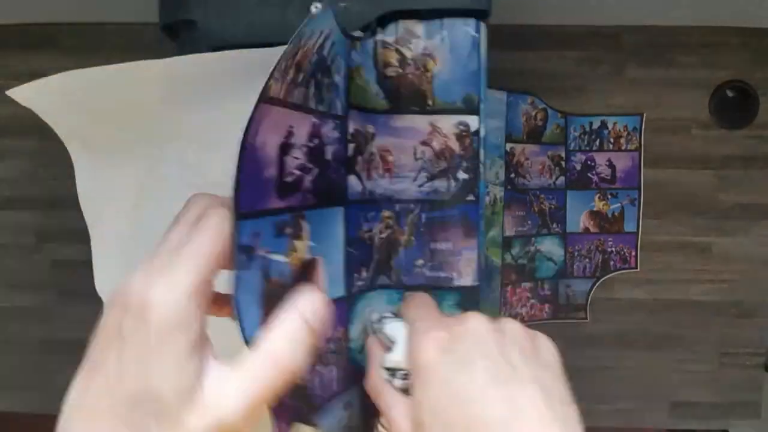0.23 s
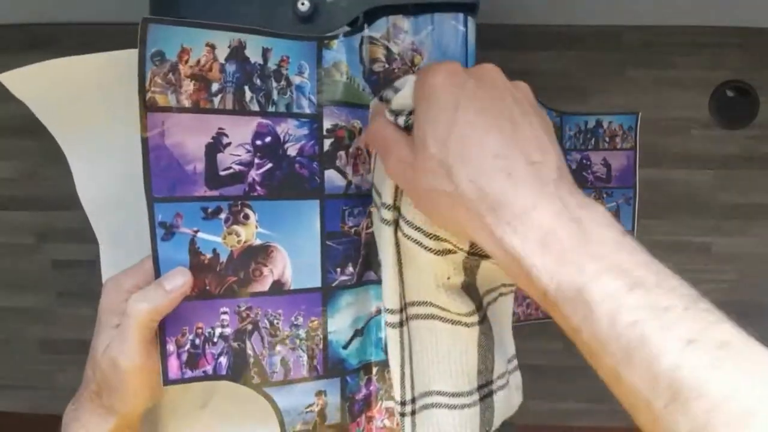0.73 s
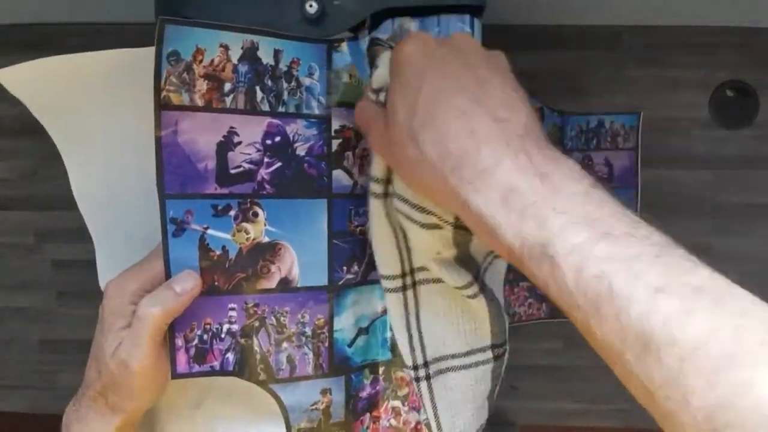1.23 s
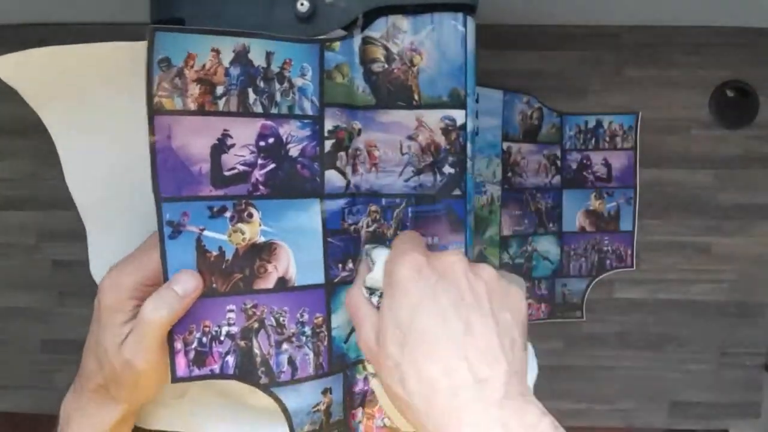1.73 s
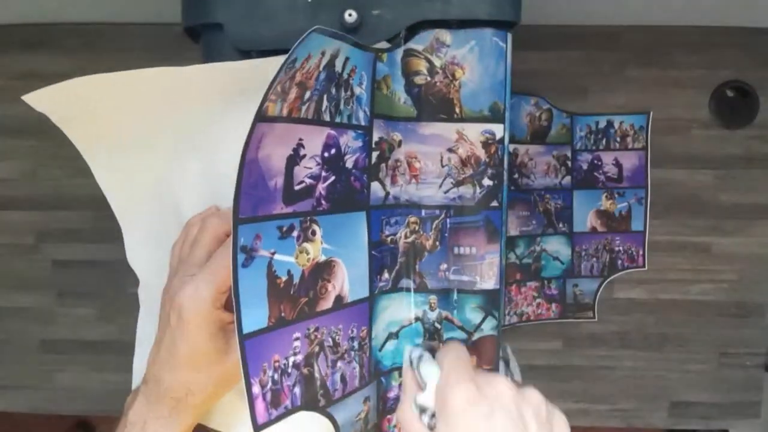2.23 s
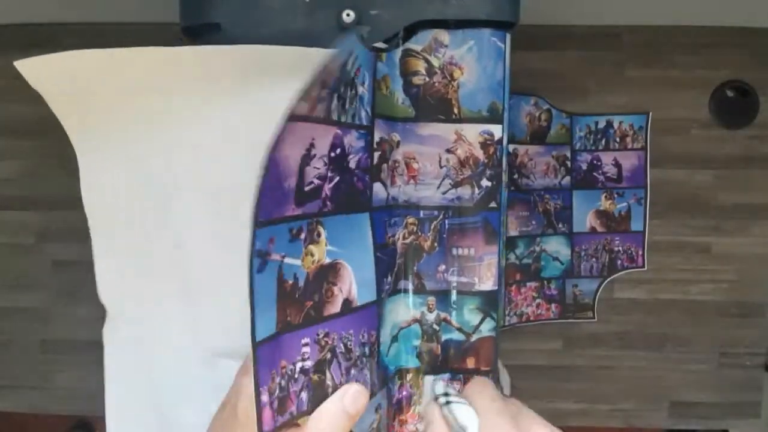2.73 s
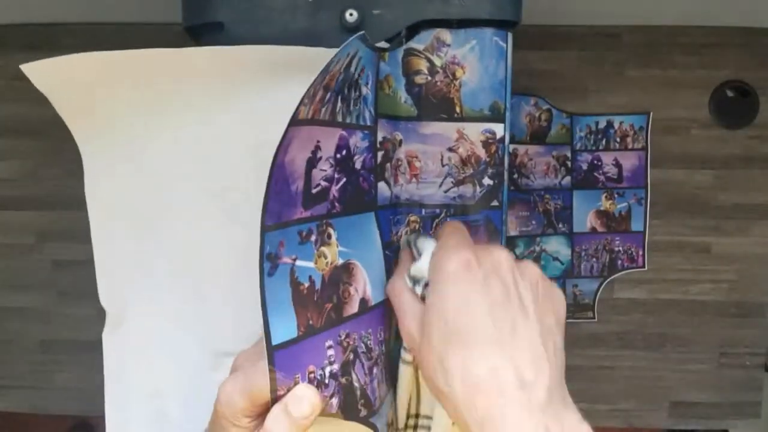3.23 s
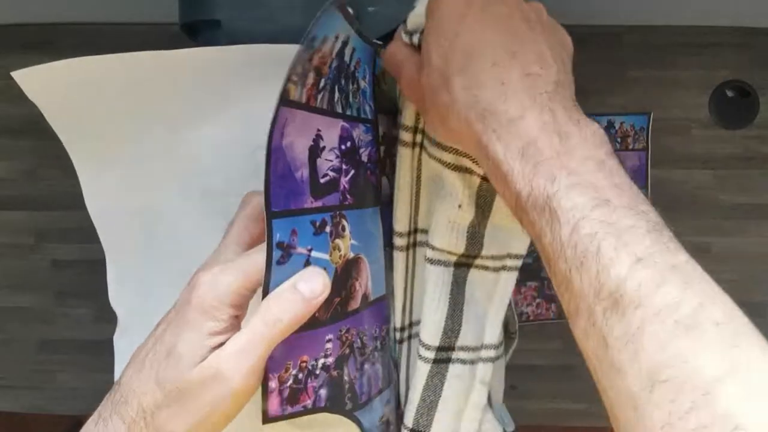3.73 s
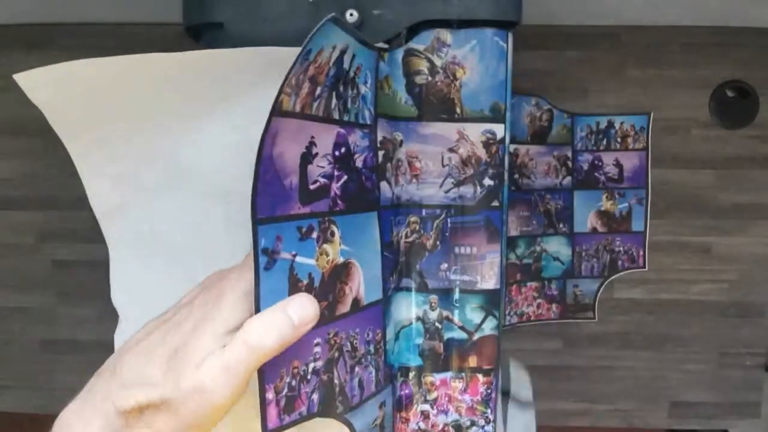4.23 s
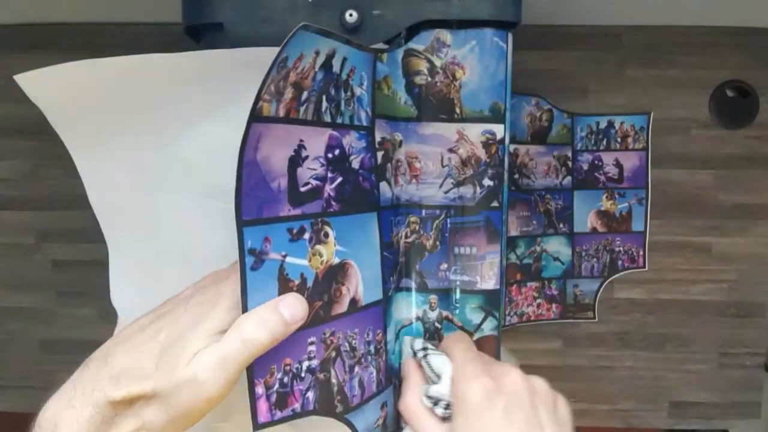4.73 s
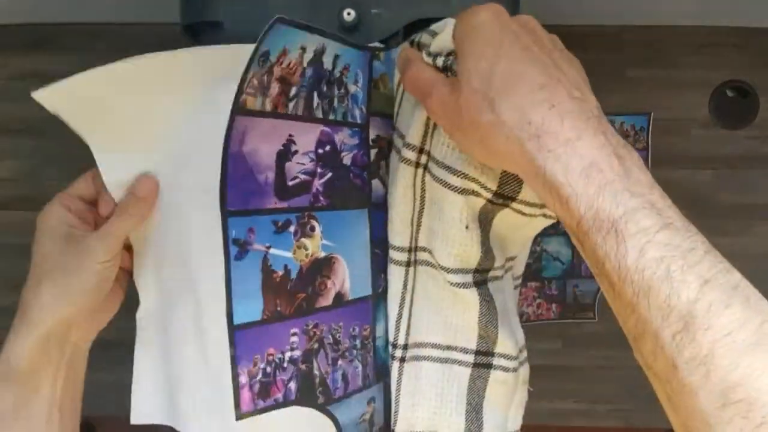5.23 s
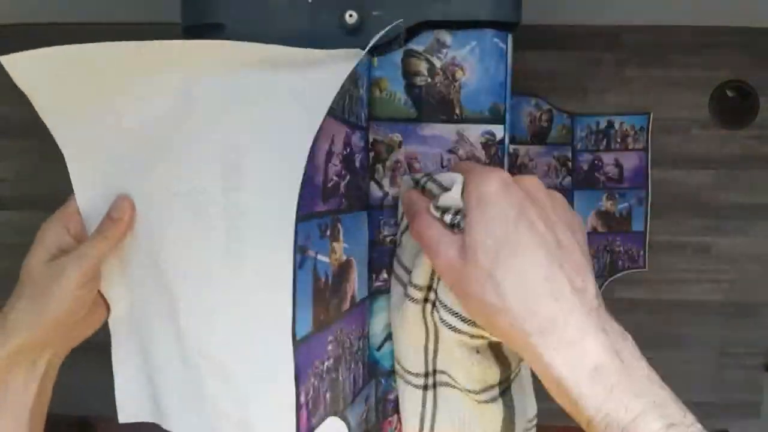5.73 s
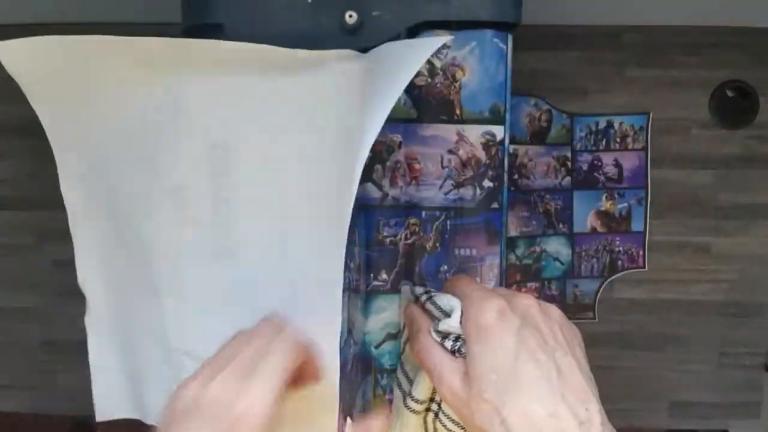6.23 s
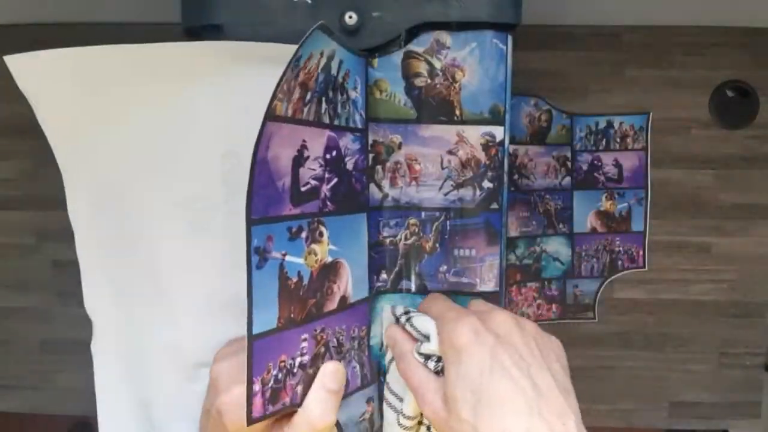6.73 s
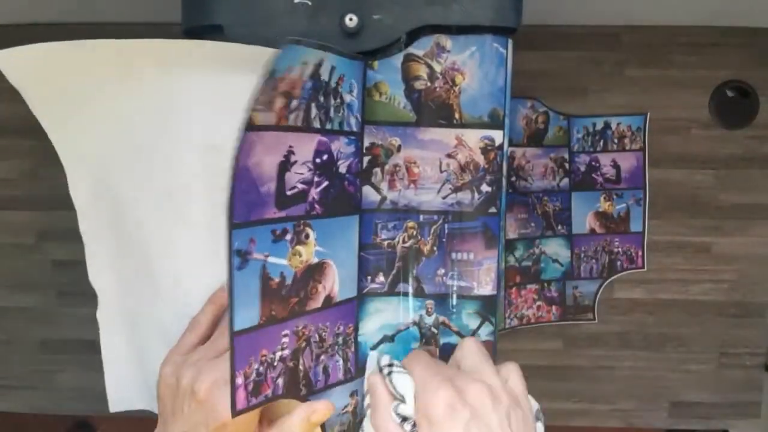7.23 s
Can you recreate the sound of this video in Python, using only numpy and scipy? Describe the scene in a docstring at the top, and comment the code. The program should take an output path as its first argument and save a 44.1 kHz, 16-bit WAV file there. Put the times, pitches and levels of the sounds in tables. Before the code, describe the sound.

A folded cloth rubs sticky film onto a hollow surface: dull irregular knocks, short dry scuffs, crisp crackles and bending paper, heard close indoors.

```python
"""Soft, hollow thumps come first, over a low room tone, then the hiss of cloth and sharp snaps among them.
A hand presses adhesive film onto a ridged hollow panel with a folded cloth, just under a phone, in a small room.
Each press is an impulse that rings the panel's low modes; the sliding cloth hisses by stick-slip friction.
Film and backing paper snap and crackle as filtered noise bursts; a bending sheet rings with rising pitch.
Near walls add a short diffuse tail, and two microphone ports pick up the sum."""
import sys
import numpy as np
from scipy import signal
from scipy.fft import rfft, irfft
from scipy.io import wavfile
from scipy.ndimage import uniform_filter1d

SR = 44100
rng = np.random.default_rng(int(sys.argv[2]) if len(sys.argv) > 2 else 0)


def log_audio(samples):
    """Write samples as a 16-bit WAV file to the path given in sys.argv[1]."""
    # one column per channel
    frames = np.atleast_2d(samples).T
    # limit to full scale, then quantise
    limited = np.clip(frames, -1, 1)
    pcm = np.round(limited * 32767).astype(np.int16)
    wavfile.write(sys.argv[1], SR, pcm)


N = 330750


def undb(db):
    """Logarithmic level: dB to amplitude gain."""
    return 10 ** (np.asarray(db) / 20)


def level(x, db):
    """Effective value: scale a signal to an rms level in dB."""
    return x * undb(db) / np.sqrt(np.mean(x ** 2))


def band(x, hz, width_hz):
    """Simple resonance: a band-pass with gain 1 at its centre."""
    b, a = signal.iirpeak(hz, hz / width_hz, fs=SR)
    return signal.lfilter(b, a, x)


def resonate(x, modes):
    """Modal superposition: a sum of driven resonances, rms 1."""
    return level(sum(undb(db) * band(x, hz, width_hz) for hz, width_hz, db in modes), 0)


def hump(x, hz, octaves):
    """Spectral shaping: a bell-shaped band on a log-frequency axis, rms 1."""
    n = x.shape[-1]
    f = np.maximum(np.arange(n // 2 + 1) * SR / n, 1)
    bell = np.exp(-.5 * (np.log2(f / hz) / octaves) ** 2)
    return level(irfft(rfft(x) * bell, n), 0)


def colour(x, points):
    """Linear filtering: apply a curve of gain/dB against f/Hz, interpolated on log frequency."""
    hz, db = np.transpose(points)
    log_f = np.log(np.maximum(np.arange(N // 2 + 1) * SR / N, 1))
    return irfft(rfft(x) * undb(np.interp(log_f, np.log(hz), db)), N)


def walk(rate_hz):
    """Random modulation: levels held for 1 / rate and slewed twice, spread near 1."""
    k = int(SR / rate_hz)
    steps = np.repeat(rng.standard_normal(N // k + 1), k)
    return 1.44 * uniform_filter1d(uniform_filter1d(steps, k), k)[:N]


def pair(alike, n=N):
    """Interchannel coherence: two noises that share a common part."""
    alike = np.clip(alike, 0, 1)
    mid, side = rng.standard_normal((2, n))
    return np.sqrt((1 + alike) / 2) * mid + np.sqrt((1 - alike) / 2) * side * np.array([[1], [-1]])


def sides(pan_db):
    """Level difference: left and right gains."""
    return undb(np.array([pan_db, -pan_db]) / 2)


def add(out, s, piece, lag_s=0.):
    """Arrival-time difference: mix in a short sound that reaches the right port lag_s later."""
    for side, at in enumerate((s, s + lag_s)):
        i = int(at * SR)
        a, b = max(i, 0), min(i + piece.shape[-1], N)
        out[side, a:b] += piece[side, a - i:b - i]


# spectrum of the room tone: f/Hz, spectral level/dB (per Hz, relative)
ROOM_SPECTRUM = [(12, -64), (20, 13.5), (49, 4.5), (123, 18.5), (227, -6.5), (292, 12), (432, -17),
                 (1500, -40), (4910, -48), (10700, -64), (15900, -115)]
ROOM_DB = -65  # rms before the slow drift


def room_tone():
    """Stationary noise: the same coloured noise at both ports, its level drifting slowly."""
    return level(colour(pair(1.0), ROOM_SPECTRUM), ROOM_DB) * undb(0.25 * walk(6.7))


ECHO_T60_S, ECHO_DB = 0.22, -18


def room(x):
    """Diffuse reverberation: near walls return a short, dull, exponentially decaying tail."""
    t = np.arange(int(.3 * SR)) / SR
    decay = np.exp(-np.log(1000) * t / ECHO_T60_S) * (t > .004)
    tail = band(rng.standard_normal((2, len(t))), 1440, 3700) * decay
    tail = tail / np.sqrt((tail ** 2).sum(1, keepdims=True))  # unit energy per side
    return undb(ECHO_DB) * signal.fftconvolve(x, tail, axes=1)[:, :N]


# sliding of the cloth under the louder strokes: t/s, hiss level/dB, treble level/dB, panel rumble level/dB
SLIDE_LEVELS = [(0.0, -69, -80, -60), (0.5, -77.5, -83, -64), (1.19, -74, -85.5, -61.5),
                (2.15, -74.5, -82, -60), (2.4, -70, -77, -58), (3.34, -65.5, -73, -56),
                (3.72, -65, -79, -66), (4.11, -78, -75, -55), (4.41, -66.5, -67, -63), (4.6, -74, -92, -62),
                (4.84, -65.5, -63.5, -66.5), (4.99, -64, -79, -50.5), (5.22, -62, -73, -45.5),
                (5.41, -67, -78, -54), (5.83, -68, -75, -58.5), (6.14, -72.5, -95, -55.5),
                (6.37, -75, -85, -50.5), (6.68, -75.5, -88, -61), (7.14, -74, -90, -62.5),
                (7.5, -69.5, -73, -56.5)]
# the hand pauses and the sliding dies down: t/s, level change/dB, length/s
HAND_PAUSES = [(1.015, -0.5, .03), (1.17, -4, 0.02), (2.447, -10, 0.13), (2.93, -5.5, 0.11),
               (3.76, -1, 0.013), (4.42, -16, 0.025), (4.733, -9.5, 0.035), (5.218, -23, 0.023),
               (5.471, -14, 0.013), (5.714, -6.5, 0.057), (5.878, -11, 0.028), (6.339, -25, 0.037),
               (6.507, -10, .015), (6.67, -10.5, 0.027), (6.823, 0, .03), (7.117, -15, 0.0082),
               (7.442, -29, 0.026)]
# share of a pause's level change (no unit) felt by: hiss, treble, rumble
PAUSE_PORTIONS = [1, 0.98, 1]


def sliding(t):
    """Friction envelope: hiss, treble and rumble levels in dB, all sinking where the hand pauses."""
    s, *columns = np.transpose(SLIDE_LEVELS)
    dip_db = sum(db * np.exp(-((t - at) / max(length, .005)) ** 2) for at, db, length in HAND_PAUSES)
    return [np.interp(t, s, c) + share * dip_db for c, share in zip(columns, PAUSE_PORTIONS)]


def grains(alike, n, spread_db, share):
    """Stick-slip friction: noise in which a share of the fibres slips much harder."""
    boost_db = np.minimum(spread_db * rng.exponential(size=n), 14)
    return pair(alike, n) * undb(boost_db * (rng.random(n) < share))


# bands of cloth on film: f/Hz, width/octaves, level/dB
HISS_BANDS = [(570, 0.63, -10), (993, 0.12, -14.5), (1815, 0.21, -12), (3200, 0.53, -14.5),
              (4500, 0.16, -10)]
# panel resonances under a sliding hand: f/Hz, width/Hz, level/dB
RUMBLE_MODES = [(43, 13, -50), (120, 39, 11), (168, 31, 3), (300, 6.7, -4.5), (590, 40, -65)]


def cloth():
    """Stick-slip friction: fibres slip in dense uneven grains and the same slide shakes the panel."""
    hiss_db, treble_db, rumble_db = sliding(np.arange(N) / SR)
    drag_db = 8.0 * np.minimum(walk(45), 1.5)
    slips = grains(0.026, N, 1.3, 0.077)
    # each band wanders in level by itself, so the hiss is patchy
    hiss = sum(undb(db + 2.14 * walk(30)) * hump(slips, hz, octaves) for hz, octaves, db in HISS_BANDS)

    # lone threads snag, about 40 a second, each a burst with a 2.3 ms decay
    catches = (rng.random(N) < 40 / SR) * undb(2.9 * rng.standard_normal(N)) * pair(0.7)
    snag_force = signal.lfilter([1], [1, -np.exp(-1 / (0.0023 * SR))], np.abs(catches))
    snags = snag_force * hump(pair(0.51), 1550, 1.0)

    treble = hump(slips, 7860, 0.27) * undb(treble_db + drag_db + 0.75 * walk(30))
    shake_db = 10.2 * np.minimum(walk(22), 1.2)
    rumble = resonate(pair(0.45), RUMBLE_MODES) * undb(rumble_db + shake_db)
    return (hiss * undb(drag_db) + undb(-1.5) * snags) * undb(hiss_db) + treble + rumble


# the held sheet flexes and its ring bends upward: t/s, peak level/dB, start f/Hz, end f/Hz, glide length/s
SHEET_FLEXES = [(5.598, -43, 464, 630, 0.033), (5.63, -47, 600, 668, 0.022), (5.79, -51.5, 561, 683, 0.022),
                (6.151, -53, 561, 624, 0.037)]


def flexes():
    """Bending stiffness: a bending sheet stiffens, so its ring glides up."""
    out = np.zeros((2, N))
    t = np.arange(4096) / SR - .045
    for s, db, hz, end_hz, length in SHEET_FLEXES:
        pitch_hz = np.interp(t, [-length / 2, length / 2], [hz, end_hz])
        tone = np.sin(2 * np.pi * np.cumsum(pitch_hz) / SR) * np.exp(-(t / (0.71 * length)) ** 2)
        roughness = 1 + 0.44 * hump(pair(0.32, len(t)), 76, .9)
        add(out, s + t[0], undb(db) * tone * roughness)
    return out


# strokes of cloth and paper: t/s of the peak, level/dB, centre f/Hz, treble level/dB (relative), fade/s
STROKES = [(0.209, -67.5, 1900, -2, 0.036), (0.267, -57.5, 2200, -5, 0.013),
           (0.287, -58.5, 2400, -10, 0.0079), (0.357, -63.5, 2000, 2, 0.021),
           (0.409, -58.5, 1400, -4.5, 0.085), (.531, -45.5, 1760, -45, 0.013),
           (0.643, -67, 2400, -1, 0.011), (0.709, -63, 1590, -32, 0.0086), (0.773, -66.5, 2500, -3, 0.023),
           (0.808, -60, 1470, -25, .015), (0.877, -69.5, 2000, 2, .012), (0.92, -66, 1800, -12, 0.043),
           (.968, -58, 2000, -8, 0.016), (1.08, -54.5, 1860, -10, 0.02), (1.247, -58.5, 1860, -31, 0.01),
           (1.365, -55, 1350, -28, 0.011), (1.488, -67, 1480, -35, 0.0069), (1.61, -65, 1370, -26, 0.014),
           (1.669, -56, 1080, -15, 0.013), (1.747, -44, 1300, -48, 0.0024), (1.772, -52.5, 1860, -8, .015),
           (1.903, -51.5, 1630, -38, 0.015), (1.939, -56, 1600, -1, 0.027),
           (2.112, -45.5, 2240, -51, 0.015), (2.355, -48, 2400, -31, .011), (2.603, -59.5, 2600, -2, 0.042),
           (2.628, -55, 1580, -13, 0.0095), (2.67, -40.5, 2140, -48, 0.018), (2.789, -38, 2130, -12, 0.023),
           (2.914, -74, 2000, -10, 0.0058), (2.973, -76, 1700, -8, 0.0035), (3.06, -46.5, 1750, -18, 0.02),
           (3.129, -57, 2460, -3, 0.048), (3.191, -44.5, 1790, -46, 0.0077), (3.211, -40, 1760, -46, .004),
           (3.29, -45.5, 2480, 2, 0.021), (3.397, -45.5, 2180, -20, 0.013), (3.486, -53, 1750, -15, .02),
           (3.505, -47, 2110, -46, 0.0096), (3.622, -48.5, 2800, -38, 0.0029),
           (3.66, -42, 1730, -11, 0.022), (3.907, -57.5, 1380, -22, 0.023), (3.953, -61, 2460, -5, 0.033),
           (4.066, -50.5, 1790, -10, 0.037), (4.168, -75, 1200, -30, .02), (4.308, -63.5, 2800, -7, 0.081),
           (4.363, -58, 2800, -13, 0.013), (4.445, -51, 3530, -10, 0.02), (4.511, -49, 2220, -5.5, 0.031),
           (4.563, -50, 2400, -3, 0.011), (4.647, -58.5, 2240, -37, 0.0092), (4.831, -53, 2800, -8, 0.01),
           (4.902, -60, 2860, -7, 0.064), (5.016, -45.5, 2040, -2.5, 0.052), (5.094, -41, 2460, -12, .014),
           (5.195, -56.5, 2240, 7, 0.027), (5.267, -42, 2200, -7.5, 0.027), (5.323, -34.5, 1790, -6, 0.023),
           (5.366, -55.5, 2500, 8, 0.031), (5.405, -44, 1700, -27, 0.015), (5.433, -48.5, 1760, -24, 0.02),
           (5.494, -59, 1400, -26, 0.0058), (5.601, -57, 1750, -5, 0.021), (5.632, -49, 1500, -13.5, 0.019),
           (5.785, -62, 1350, -11.5, 0.038), (5.832, -59, 2000, -19, .005), (5.931, -58, 2450, -16, 0.03),
           (5.986, -50, 3100, -9, 0.03), (6.04, -50, 2200, -4.5, 0.032), (6.11, -54.5, 1900, -12, 0.016),
           (6.286, -54, 2300, -10, 0.019), (6.379, -41.5, 3100, -34, .022),
           (6.445, -39.5, 2480, -8.5, 0.018), (6.556, -47, 1940, -51, 0.011), (6.578, -56, 1300, -29, .008),
           (6.726, -72, 2100, -1, 0.016), (6.798, -64, 1800, -6, 0.0091), (6.944, -56, 2600, -2.5, 0.059),
           (6.985, -40.5, 2050, -9, 0.019), (7.16, -53.5, 1490, -7, 0.036), (7.218, -61.5, 3000, -5, 0.027),
           (7.295, -55.5, 990, -40, 0.041), (7.335, -58, 1390, -31, 0.027)]
RISE_SHARE = 0.66  # a stroke swells in this share of its fade time
SCUFF_PAN_DB, PAN_SPREAD_DB = 0.5, -1.5
LAG_SPREAD_S = .00015  # random lag between the ports


def scuffs():
    """Modulated friction noise: each stroke swells with its own colour and place, fluttering as cloth catches."""
    out = np.zeros((2, N))
    t = np.arange(16384) / SR - .1
    chance = rng.standard_normal((len(STROKES), 2))
    for (s, db, hz, treble_db, fall), c in zip(STROKES, chance):
        rise = RISE_SHARE * fall
        pan_db = SCUFF_PAN_DB + PAN_SPREAD_DB * c[0]
        lag_s = LAG_SPREAD_S * c[1]
        growth = np.exp(-(t / max(rise, .001)) ** 2)
        fade = np.exp(-np.abs(t) / max(fall, .002))
        swell = np.where(t < 0, growth, fade)
        flutter = undb(1.78 * hump(rng.standard_normal(len(t)), 58, 1.0))
        slips = grains(0.63, len(t), 2.1, 0.051)
        stroke = hump(slips, hz, 1.0) + undb(treble_db) * hump(slips, 7420, 0.5)
        add(out, s + t[0], stroke * swell * flutter * undb(db) * sides(pan_db)[:, None], lag_s)
    return out


# film and paper snap: t/s, peak level/dB, ring f/Hz, click treble level/dB (relative)
CREASES = [(0.528, -35, 985, -30), (.966, -43.5, 1670, -21), (1.082, -37, 1090, -1),
           (1.359, -46, 1010, -30), (1.48, -42, 1030, -37), (1.752, -45, 1000, -35),
           (1.772, -42, 2040, -10), (1.902, -35, 940, -36), (1.945, -25.5, 944, -7),
           (2.093, -40.5, 1430, -27), (2.116, -32, 1095, -36), (2.353, -41, 1010, -22),
           (2.661, -31, 2750, -30), (2.757, -35, 1010, -33), (2.787, -13.5, 2090, -2.5),
           (2.913, -55, 2980, -12), (3.017, -42, 2400, -14), (3.059, -26, 1050, 0), (3.087, -37, 2500, -25),
           (3.193, -35, 1200, -35), (3.21, -35, 990, -32), (3.264, -43, 2440, -25), (3.289, -28, 1730, -20),
           (3.393, -26.5, 2190, -35), (3.481, -33.5, 1050, -15), (3.653, -32, 2000, -22),
           (3.668, -23, 2080, -10), (3.863, -42.5, 980, -9), (3.892, -52, 900, -28),
           (4.063, -29.5, 1070, -27), (4.648, -57, 935, -39), (5.098, -28.5, 1040, -23),
           (5.183, -41.5, 895, -13), (5.224, -43.5, 4810, -36), (5.261, -48, 1630, -20),
           (5.398, -21, 1456, -29), (5.428, -34, 1420, -26), (5.623, -38, 1190, -20),
           (6.369, -34, 2860, -25), (6.379, -38, 4200, -25), (6.389, -46, 3200, -25),
           (6.44, -23.5, 1190, -16), (6.552, -33, 1430, -36), (6.872, -49, 1200, -25),
           (6.979, -25.5, 1170, -23), (7.133, -43, 900, -20), (7.283, -54, 910, -35)]
CLICK_S, CRACKLE_S, CLICK_TREBLE_HZ = .00018, .002, 8700  # two decay times, one band centre


def snaps():
    """Sudden release of strain: a crease lets go in a click and a short crackle ringing near one pitch."""
    out = np.zeros((2, N))
    t = np.arange(1024) / SR - .004
    lags_s = LAG_SPREAD_S * rng.standard_normal(len(CREASES))
    for (s, db, hz, treble_db), lag_s in zip(CREASES, lags_s):
        decay = np.exp(-np.abs(t) / CRACKLE_S) + 2.2 * np.exp(-np.abs(t) / CLICK_S)
        force = pair(0.93, len(t)) * (t > 0) * decay
        snap = level(band(force, hz, 0.12 * hz), 0)
        snap = snap + 0.66 * hump(force, 2540, 0.76)
        snap = snap + undb(treble_db) * hump(force, CLICK_TREBLE_HZ, 0.37)
        snap = snap + 0.59 * hump(force, 640, 1.0)
        add(out, s + t[0], snap * undb(db) / np.abs(snap.mean(0)).max(), lag_s)
    return out


def ring(t, modes):
    """Free modal decay: modes set ringing at t = 0, each press with its own strengths, peak 1."""
    chance = rng.standard_normal((len(modes), 3))
    out = 0
    for (hz, db, t60), (a, b, p) in zip(modes, chance):
        decay = np.exp(-np.log(1000) * np.maximum(t, 0) / t60)
        wave = np.sin(2 * np.pi * hz * (1 + 0.028 * b) * t + np.pi * p)
        out = out + undb(db + 3.3 * a) * decay * wave
    return out / np.abs(out[t > 0]).max()


# presses on the panel: t/s of the peak, level/dB, upper-mode level/dB (re lowest mode),
# film rumple level/dB (re lowest mode), length/s
PRESSES = [(.05, -47.5, -5.5, -36, 0.019), (0.08, -41, -18.5, -33, .014), (0.096, -40.5, -14, -42, 0.0063),
           (.201, -47, -6, -27, 0.024), (0.277, -56.5, 0, -2, 0.009), (.362, -36.5, -30, -28, 0.022),
           (.405, -42.5, 9.5, -2, 0.016), (0.419, -34, -5.5, -20, 0.025), (.438, -27.5, -21, -43, 0.011),
           (.534, -52, 0, -15, 0.019), (.583, -52, -32, -25, 0.034), (.637, -44, -14, -20, 0.01),
           (0.703, -45, -11, -18, 0.025), (0.773, -39.5, -14.5, -24, 0.022), (0.807, -50, -5, -26, .012),
           (0.872, -47.5, -10, -22, .033), (1.091, -58.5, 7.5, 3, 0.022), (1.26, -39, -18, -23, .01),
           (1.304, -47.5, -6.5, -13, 0.0071), (1.374, -34.5, -12.5, -18, 0.017),
           (1.67, -45.5, -9, -24, 0.033), (1.783, -43, -21, -40, 0.013), (1.906, -37, -7, -13, 0.018),
           (1.951, -47, -14, -4.5, 0.017), (2.003, -24.5, -6, -24, 0.014), (2.04, -39, -12, -26, 0.028),
           (2.098, -30.5, -9.5, -22.5, 0.0077), (2.12, -36, -16, -19, 0.017), (2.227, -33, -17, -31, 0.011),
           (2.255, -42.5, -29, -42, 0.046), (2.361, -44, -2.5, -13, 0.0084),
           (2.525, -40.5, -8.5, -26.5, 0.012), (2.616, -41.5, -9, -18, 0.022),
           (2.672, -38.5, 0, -6.5, 0.0076), (2.793, -32, -7, -5, 0.012), (2.831, -21, -10.5, -24.5, 0.022),
           (2.902, -32.5, -15.5, -37, .017), (3.066, -39, -2.5, -1, 0.012), (3.136, -32.5, -24, -39, 0.015),
           (3.193, -40.5, -3.5, -14.5, 0.029), (3.237, -39, -18, -17, .026), (3.271, -30.5, -21, -26, .012),
           (3.295, -30, -7, -18.5, .021), (3.392, -44.5, -4.5, -15, 0.0042),
           (3.49, -30, -7.5, -17.5, 0.015), (3.674, -41.5, -1.5, -6, .014), (3.814, -47, -33, -37, .016),
           (3.874, -34.5, -7, -26, 0.02), (3.901, -28, -4.5, -11, .016), (3.935, -43, -6, -11, 0.035),
           (4.074, -34.5, -14, -17.5, 0.012), (4.134, -35.5, -27, -28, .01),
           (4.147, -35.5, -15, -15, 0.027), (4.176, -23.5, -8.5, -27, 0.011),
           (4.205, -36, -7, -20.5, 0.024), (4.648, -41.5, -18, -43, 0.0066),
           (4.83, -43.5, -8.5, -26, 0.024), (4.883, -48.5, -17, -37, 0.12),
           (4.913, -44.5, -4.5, -24, 0.012), (5.003, -54.5, -11, -3, 0.028), (5.047, -48, -12, -3.5, 0.015),
           (5.103, -32, -10.5, -21, 0.013), (5.137, -37, -18, -12.5, 0.016), (5.177, -33, -22, -25, 0.011),
           (5.261, -39.5, 0.5, -5, 0.014), (5.329, -51, 12.5, 8.5, 0.025), (5.409, -38.5, -1, -7.5, 0.02),
           (5.493, -56, -7, 0, .013), (5.553, -23.5, -5.5, -32, 0.013), (5.56, -32, -9, -21, 0.0094),
           (5.595, -22.5, -13, -27, 0.0086), (5.624, -29.5, -18, -13, 0.0093),
           (5.767, -42.5, 3.5, -30, 0.0077), (5.795, -40, -5, -16, 0.014), (5.921, -50.5, -5, -30, 0.019),
           (5.983, -40, -11, -37, 0.0089), (6.002, -33, -10.5, -20, 0.026), (6.046, -28, -8, -16.5, 0.024),
           (6.107, -28, -6.5, -33, .009), (6.133, -38, -17, -15, 0.02), (6.181, -33.5, -8.5, -23, .018),
           (6.204, -33, -5.5, -29, 0.016), (6.226, -35.5, -5.5, -19, 0.019), (6.263, -50, -4, -10, 0.019),
           (6.383, -44, -15, -8.5, .02), (6.451, -39.5, -8.5, -10.5, 0.018),
           (6.535, -32, -15, -23.5, 0.016), (6.588, -35.5, -8.5, -11, .017), (6.644, -43, -36, -36, .013),
           (6.7, -46.5, -4, -30, 0.0078), (6.757, -47, -12, -46, 0.041), (6.8, -33.5, -13.5, -43, 0.0092),
           (6.94, -44, -7, -13.5, 0.016), (6.987, -44.5, -2, -1, 0.02), (7.016, -22, -20, -27, 0.014),
           (7.044, -36, -6, -22.5, 0.034), (7.143, -36, -1, -12.5, 0.01),
           (7.163, -27.5, -9.5, -22.5, 0.014), (7.189, -33, -24, -36, 0.0092), (7.22, -44, -13, -34, 0.006),
           (7.34, -30, -10.5, -22.5, 0.0071), (7.384, -50, -32, -32, 0.012),
           (7.482, -35.5, -5.5, -28, 0.0099)]
# upper modes of the panel: f/Hz, level/dB, T60/s
PANEL_MODES = [(292.4, 1.5, 0.079), (210, -0.5, 0.014), (368, -13.5, 0.17)]
# modes of the taut film: f/Hz, level/dB, T60/s
FILM_MODES = [(553, -1, 0.069), (617.4, -1, 0.082), (762, -3.5, 0.16), (992, -2, 0.076)]
LOWEST_HZ, LOWEST_SPREAD = 122.3, .055  # lowest panel mode and its relative spread
PRESS_MIN_S = .004  # shortest press


def thumps():
    """Impulse response: a soft push rings the panel's modes, rocks the table and rumples the film."""
    out = np.zeros((2, N))
    t = np.arange(8192) / SR - .06
    late = np.maximum(t, 0)  # the force builds up before t = 0, the rings die away after
    chance = rng.standard_normal((len(PRESSES), 5))
    for (s, db, upper_db, rumple_db, length), c in zip(PRESSES, chance):
        hz = LOWEST_HZ * (1 + LOWEST_SPREAD * c[4])  # the mode shifts a little with the spot pressed
        length = max(length, PRESS_MIN_S)
        swell = np.exp(-(np.minimum(t, 0) / (.7 * length)) ** 2)
        low = np.cos(2 * np.pi * hz * t + 0.67 * c[0]) * np.exp(-(late / (0.35 * length)) ** 0.63)
        upper = undb(upper_db) * ring(t, PANEL_MODES)
        film = undb(rumple_db) * ring(t, FILM_MODES)
        press = swell * (low + upper + film)

        rock_hz = 65 * undb(4.5 * c[2])
        rock = undb(-33 + 3.8 * c[1]) * np.cos(2 * np.pi * rock_hz * t) * np.exp(-(t / 0.09) ** 2)

        # each spot reaches the ports a little out of step: the slope of the wave acts as a small lag
        slope = np.gradient(swell * low) * SR / (2 * np.pi * hz)
        skew = 0.043 * c[3] * slope + 0.31 * rock + 0.25 * c[1] * press

        rumple = hump(pair(0.083, len(t)), 448, 1.0) * swell * np.exp(-late / (1.05 * length))
        both = np.array([press + rock + skew, press + rock - skew])
        add(out, s + t[0], undb(db) * (both + 1.1 * undb(rumple_db) * rumple))
    return out


def scene():
    """Superposition: hand, cloth, film and paper over the room tone; all but thumps and tone reverberate."""
    bright = snaps() + scuffs() + cloth() + flexes()
    return thumps() + bright + room(bright) + room_tone()


# shading of the two ports by the phone's body: f/Hz, left-minus-right level/dB
PORT_SHADING = [(60, 0.5), (700, 1.1), (2400, 1.5), (5000, 3.5), (7000, 9.5), (8500, -5.5), (11500, -14),
                (14000, 1)]
# microphone colour: f/Hz, gain/dB
MIC_RESPONSE = [(20, 2.5), (5000, -3), (8000, -11.5), (12000, -9.5), (14000, -7), (16000, -23)]
# spectrum of the microphones' steady hiss: f/Hz, spectral level/dB (per Hz, relative)
MIC_HISS = [(400, -25), (700, 0.5), (3000, -6), (5000, -9.5), (8500, -19), (12000, -16), (15000, -34)]
SELF_NOISE_DB = -77.5  # rms before the top is cut
PORT_LAG_S, TOP_HZ = .0001, 15800  # lag of the right port, low-pass corner


def record(dry):
    """Two-point reception: spaced ports shaded by the phone's body, faint self-noise and a cut top."""
    left = colour(dry[0], [(hz, db / 2) for hz, db in PORT_SHADING])
    right = colour(dry[1], [(hz, -db / 2) for hz, db in PORT_SHADING])
    right = np.roll(right, int(PORT_LAG_S * SR))
    self_noise = level(colour(pair(0.068), MIC_HISS), SELF_NOISE_DB)
    both = colour(np.array([left, right]), MIC_RESPONSE) + self_noise
    low_pass = signal.ellip(8, .2, 70, TOP_HZ, fs=SR, output="sos")
    return signal.sosfilt(low_pass, both)


dry = scene()
out = record(dry)
log_audio(out)
```